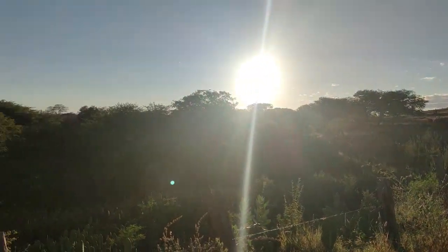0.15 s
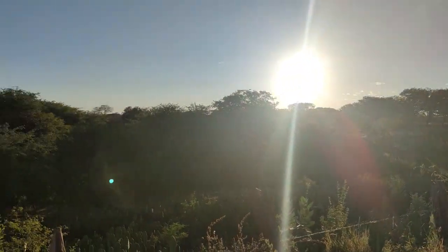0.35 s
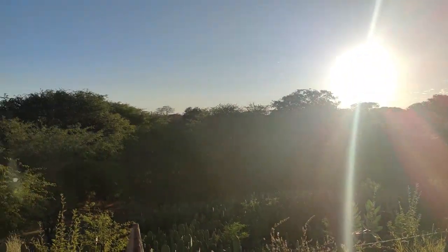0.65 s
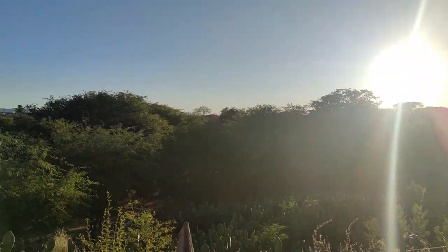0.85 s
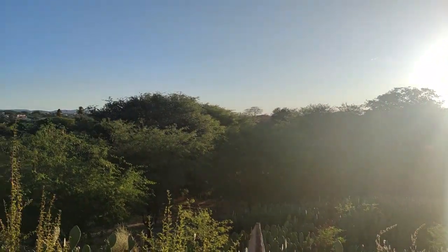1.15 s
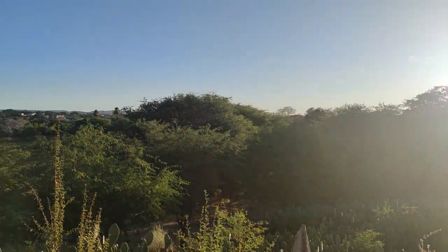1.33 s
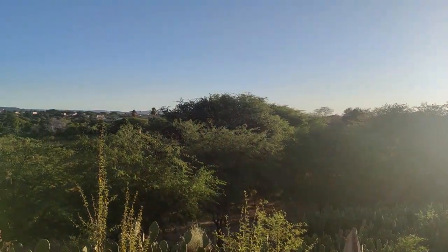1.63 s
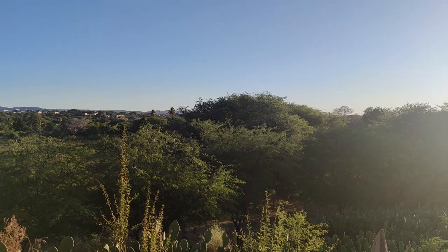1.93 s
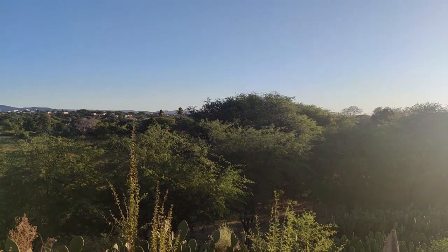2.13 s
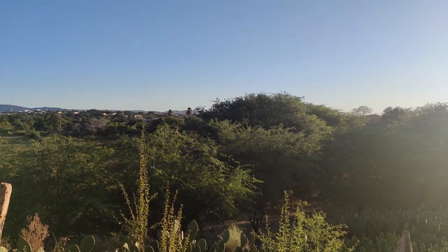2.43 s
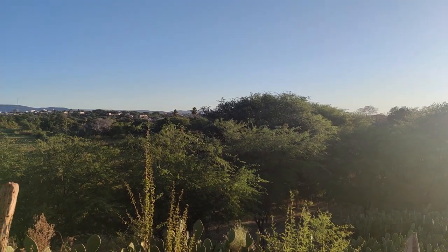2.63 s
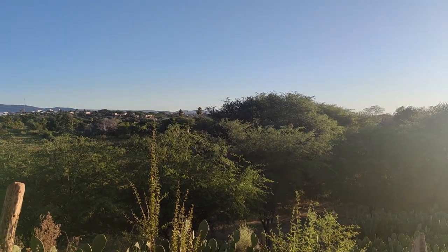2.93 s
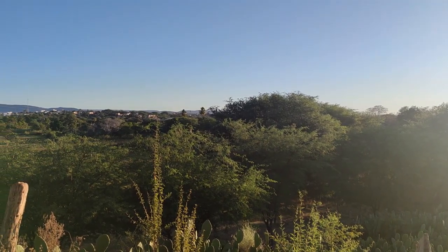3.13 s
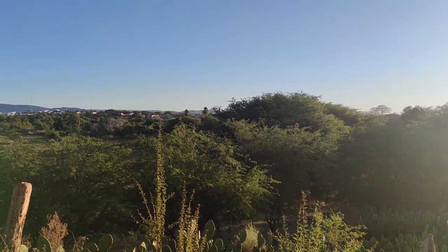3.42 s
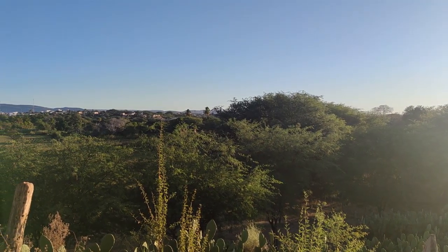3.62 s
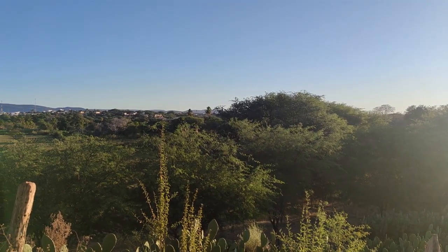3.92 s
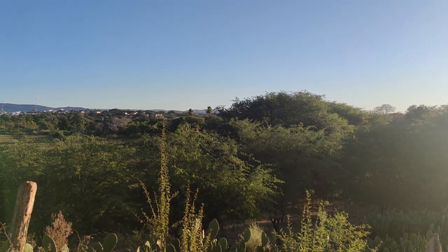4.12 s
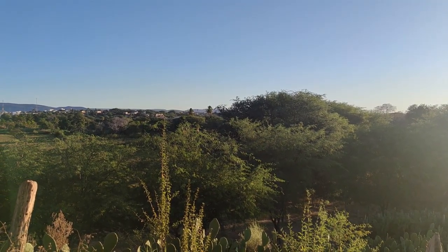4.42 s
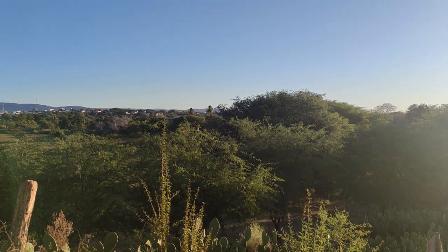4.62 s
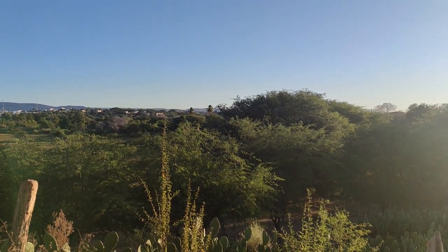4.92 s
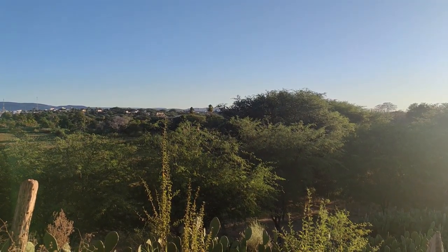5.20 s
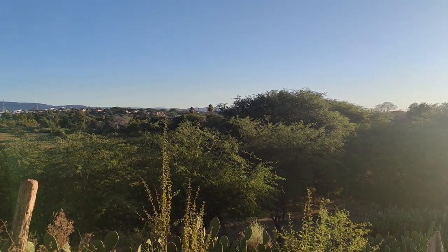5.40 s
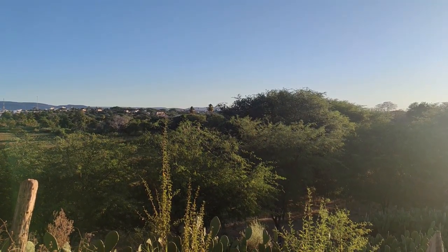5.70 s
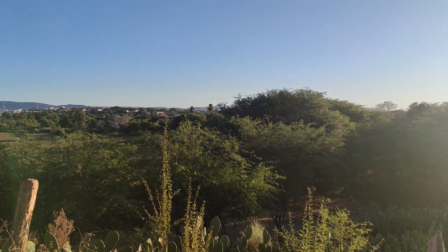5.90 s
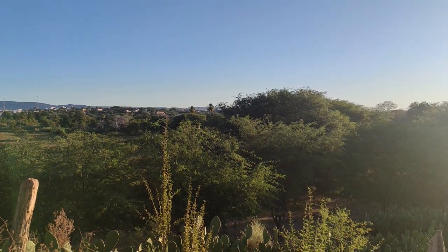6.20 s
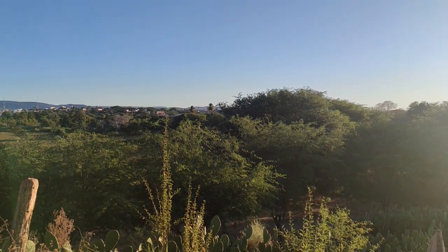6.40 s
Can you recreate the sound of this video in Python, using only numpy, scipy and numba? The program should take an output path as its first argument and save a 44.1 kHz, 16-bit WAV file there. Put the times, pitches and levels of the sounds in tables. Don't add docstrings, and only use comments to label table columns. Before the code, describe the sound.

Burry bird calls and rapid high trills over faint leafy hiss, with handling clicks and muffled wind thumps in the opening second or so.

```python
import sys
import numpy as np
from scipy import signal
from scipy.fft import rfft, irfft, dct
from scipy.io import wavfile
from scipy.ndimage import uniform_filter1d
from numba import njit

SR = 44100
rng = np.random.default_rng(int(sys.argv[2]) if len(sys.argv) > 2 else 0)


def ratio_of_db(decibels):
    return 10 ** (np.asarray(decibels, float) / 20)


def to_wav(s):
    ch = np.atleast_2d(s).T
    pcm = np.round(np.clip(ch, -1, 1) * 32767)
    wavfile.write(sys.argv[1], SR, pcm.astype(np.int16))


N = 288855
T = np.arange(N) / SR
PORT_LAG = 21


def walk(rate_hz):
    k = int(SR / rate_hz)
    held = np.repeat(rng.standard_normal(N // k + 1), k)
    return 1.816 * uniform_filter1d(uniform_filter1d(held, k), k)[:N]


def unit(x):
    return x / np.sqrt(np.mean(x ** 2))


def add(out, start_s, sound, pan_db):
    i = int(start_s * SR)
    sound = sound[max(-i, 0):N - i]
    i = max(i, 0)
    out[:, i:i + len(sound)] += sound * ratio_of_db(np.array([[pan_db], [-pan_db]]) / 2)


@njit
def low_pass(x, hz, damp):
    y, b, l = np.empty(len(x)), 0., 0.
    for i in range(len(x)):
        g = np.tan(np.pi * hz[i] / SR)
        v = (b + g * (x[i] - l)) / (1 + g * (g + damp))
        y[i] = l + g * v
        b, l = 2 * v - b, l + 2 * g * v
    return y


def wind():
    # t/s, level/dB, left minus right/dB
    slow_wind = [(0, -38.5, 16), (.18, -35.5, 20.5), (0.501, -45, 4.5), (.64, -39, -14.5), (.97, -35, -7),
                 (1.26, -28, -8), (1.57, -43, 16), (1.7, -47.5, 4), (2.0, -46, -0.5), (2.45, -49.5, 2),
                 (2.65, -50.5, 4.5), (3.57, -45.5, -0.5), (4.08, -43.5, -5), (4.27, -48, 5), (4.6, -46, -6),
                 (5.05, -46.5, 1.5), (5.76, -51, 4.5), (6.55, -49.5, -0.5)]
    # t/s, half width/s, boost/dB, left minus right/dB
    puffs = [(.16, .06, 3, 11), (0.509, .03, 9, -7), (0.698, 0.032, 6, -0.5), (0.948, 0.055, 5, 2),
             (1.02, .03, 0, 17), (1.92, .05, 5, 4.5), (2.47, .04, 6.5, -14), (2.929, 0.031, 3.5, -22),
             (3.36, 0.06, 5, -5), (3.7, 0.035, 6.5, -1), (4.048, 0.1, 8, -8), (4.549, 0.029, 4, -5),
             (4.672, .04, 9, -2.5), (5.12, 0.028, 4, -7.5), (5.28, 0.033, 3, -9.5),
             (5.639, 0.012, 11.5, 10), (6.17, 0.022, -4, -1)]
    # t/s, peak/dB, f/Hz, left minus right/dB
    eddies = [(0.161, -25, 162, 32), (0.716, -27.5, 240, -34), (0.956, -22.5, 260, -28),
              (1.019, -21, 200, 16), (1.178, -17, 230, -21), (1.19, -13.5, 120, -18),
              (1.216, -11.5, 300, -52), (1.251, -20, 260, -28), (1.301, -14.5, 240, -44),
              (1.308, -16, 280, -49), (4.023, -38, 220, -21)]
    calm_db, bright_per_db = -47, 0.2378
    s, db, pan_db = np.transpose(slow_wind)
    db, pan_db = np.interp(T, s, db), np.interp(T, s, pan_db)
    for at_s, half_s, boost_db, lean_db in puffs:
        puff = np.exp(-((T - at_s) / half_s) ** 2)
        db, pan_db = db + boost_db * puff, pan_db + lean_db * puff
    db = db - 10 * np.log10(np.cosh(pan_db * np.log(10) / 20))
    out = np.zeros((2, N))
    for port, side in enumerate((.5, -.5)):
        buffet_db = 3 * np.tanh(walk(30)) + 1.83 * walk(60)
        gust_db = db + side * pan_db
        hz = 80 * ratio_of_db(bright_per_db * (gust_db - calm_db) + 0.33 * buffet_db)
        hz = np.clip(hz, 20, 600)
        rush = low_pass(rng.standard_normal(N), hz, 2.62)
        rush = low_pass(rush, 0.97 * hz, 1.45) / np.sqrt(hz)
        out[port] = ratio_of_db(gust_db + 5.5) * unit(ratio_of_db(buffet_db) * rush)
    for s, db, hz, pan_db in eddies:
        cycles = np.arange(-2, 2, hz / SR)
        eddy = np.exp(-(cycles / 0.49) ** 2) * np.cos(2 * np.pi * cycles)
        add(out, s - 2 / hz, ratio_of_db(db - abs(pan_db) / 2) * eddy, pan_db)
    return signal.sosfilt(signal.butter(2, 22, "high", fs=SR, output="sos"), out)


def air():
    # f/Hz, density/dB per Hz
    spectrum = [(150, -15.5), (250, -11.5), (398, -8.5), (1430, -13.5), (1690, -16), (1930, -10.5),
                (2550, -12), (3170, -14), (4560, -15), (5660, -18), (6470, -14), (9320, -29), (13200, -25)]
    level_db = -66.5 + 4.0
    f = np.fft.rfftfreq(N, 1 / SR) + 1
    corner_hz, density_db = np.transpose(spectrum)
    colour = ratio_of_db(np.interp(np.log(f), np.log(corner_hz), density_db))
    shared = rng.standard_normal(N)
    mix = np.clip(.6 - f / 5000, 0, 1)
    common = rfft([np.roll(shared, PORT_LAG), shared])
    own = rfft(rng.standard_normal((2, N)))
    noise = colour * (mix * common + np.sqrt(1 - mix ** 2) * own)
    out, swell = 0, walk(1.545)
    place = 3 * np.log2(f / 150)
    for band in range(21):
        flicker_db = 0.27 * swell + 2.3 * np.array([walk(12), walk(15)])
        out = out + ratio_of_db(flicker_db) * irfft(noise * np.clip(1 - abs(place - band), 0, 1), N)
    above = irfft(rfft(out) * (f > 300) * (f < 13200), N)
    return out * ratio_of_db(level_db) / np.sqrt(np.mean(above ** 2))


def insects():
    band = signal.butter(4, [13900, 16000], "band", fs=SR, output="sos")
    throb_db = 7 * np.tanh(1.4 * walk(79) + .5)
    return ratio_of_db(-73.0) * unit(ratio_of_db(throb_db) * signal.sosfilt(band, rng.standard_normal((2, N))))


def note(out, s, hz, partials_db, burr, pan_db, burr_hz=155, edge_s=0.0019):
    t = np.arange(s[0], s[-1], 1 / SR)
    chance = rng.standard_normal((2, SR // 3))
    shake = np.interp(t, t[::64], chance[0, :len(t[::64])])
    rasp = unit(uniform_filter1d(uniform_filter1d(chance[1], size=24), size=24))[:len(t)]
    flutter = np.sin(2 * np.pi * burr_hz * t + 0.0043 * np.cumsum(shake))
    pitch = uniform_filter1d(np.interp(t, s, hz), size=300, mode="nearest")
    pitch = pitch * (1 + burr * (0.021 * flutter + 0.018 * shake))
    phase = 2 * np.pi * np.cumsum(pitch) / SR
    tone = sum(ratio_of_db(np.interp(t, s, db)) * np.sin((k + 1) * phase) for k, db in enumerate(partials_db))
    edge = np.clip(np.minimum(t - s[0], s[-1] - t) / edge_s, 0, 1)
    rough = 1 + np.clip(burr, 0, 1) * flutter + .28 * burr * rasp
    add(out, s[0], 3.25 * edge * tone * rough, pan_db)


def call(out, s, length_s, top_hz, db, pan_db, up, down, start, end, bend, drop, sag_db, first_sag_db,
         swell_db, first_db, third_db, fourth_db, burr):
    u = np.linspace(0, 1, num=25)
    rise = (1 - start) * np.clip(1 - u / up, 0, 1) ** bend
    fall = (1 - end) * np.clip((u - down) / (1 - down), 0, 1) ** drop
    share = 1 - rise - fall
    under_oct = np.log2(share)
    breath_db = 3.5 * np.interp(u, u[::4], rng.standard_normal(size=7))
    second = db + sag_db * under_oct + swell_db * (u - .5) + breath_db
    first = second + first_db + first_sag_db * under_oct
    third = second + third_db + 25 * under_oct
    fourth = second + fourth_db + 35 * under_oct
    partials_db = [first, second, third, fourth, fourth - 19, third - 24]
    note(out, s + u * length_s, top_hz * share, partials_db, burr, pan_db)


def flycatchers():
    # t/s, length/s, top f/Hz, level/dB, left minus right/dB
    harsh = [
        (2.782, .113, 1735, -55.5, 1),
        (3.02, .085, 1832, -74.5, 1.5),
        (4.49, .1, 1748, -69, 0),
        (6.098, .115, 1731, -54, 4.5),
        (6.37, .09, 1850, -72, -4.5),
    ]
    away = [
        (-0.04, .15, 1725, -57, -.5),
        (1.985, .135, 1452, -68.5, 1.5),
    ]
    sharp = [
        (.298, .108, 1717, -42, -4.5),
        (3.928, .11, 1752, -58, 1.5),
        (6.533, 0.099, 1761, -43.5, -3),
    ]
    open_throat = [
        (3.208, .112, 1660, -49.5, 3),
        (4.893, .07, 1880, -60, -0.5),
    ]
    drawn = [
        (.505, .25, 1298, -60, -6.5),
        (3.41, .27, 1305, -63, -10),
    ]
    bows = [
        (5.05, .245, 1494, -66, -2.5),
    ]
    # t/s, length/s, top f/Hz, end f/Hz, level/dB
    arches = [(.39, .1, 1685, 1181, -60), (.785, .095, 1274, 1222, -74.5), (.92, .235, 1490, 1176, -65),
              (1.51, .055, 1962, 1762, -75), (2.585, .205, 1223, 981, -64.5),
              (3.55, .17, 1484, 1152, -71.5), (4.15, .235, 1497, 1143, -70.5),
              (4.72, 0.077, 1085, 1055, -71)]
    swoops = [(.075, .07, 1546, 1012, -66.5), (.725, .055, 1685, 1255, -59), (2.42, .105, 1520, 834, -68),
              (5.615, 0.087, 1548, 938, -63.5), (5.745, 0.093, 1072, 830, -74), (6.36, .1, 1010, 830, -71)]
    # t/s, f/Hz, level/dB
    waver = [
        (5.77, 1037, -76.5),
        (5.82, 1228, -58.5),
        (5.868, 1141, -71.5),
        (5.904, 1252, -60),
        (5.985, 1040, -70.5),
    ]
    harsh_voice = dict(up=.5, down=.8, start=.66, end=0.65, bend=2.7, drop=1.6, sag_db=14.5, first_sag_db=0, swell_db=4, first_db=-10, third_db=-11, fourth_db=-14, burr=1.1)
    chirp_voice = dict(up=.21, down=0.28, start=.72, end=.58, bend=1.6, drop=1.6, sag_db=20, first_sag_db=-5.5, swell_db=-1, first_db=-20.5, third_db=-19.5, fourth_db=-19, burr=0.23)
    drawn_voice = dict(up=0.65, down=.62, start=.77, end=.78, bend=2.4, drop=4.8, sag_db=8, first_sag_db=43, swell_db=-3.5, first_db=-7, third_db=-14, fourth_db=-18.5, burr=0.12)
    bow_voice = dict(up=0.76, down=0.83, start=.67, end=0.7, bend=2.6, drop=1.9, sag_db=0.5, first_sag_db=48, swell_db=-1.5, first_db=1, third_db=-44, fourth_db=-27, burr=0.23)
    arch_voice = dict(up=.45, down=.52, bend=2.1, drop=4.2, sag_db=7, first_sag_db=9.5, swell_db=1, first_db=-13, third_db=-25, fourth_db=-35, burr=0.13)
    swoop_voice = dict(up=.25, down=0.25, bend=1.5, drop=1.3, sag_db=7, first_sag_db=5.5, swell_db=2, first_db=-12.5, third_db=-23, fourth_db=-48, burr=.2)
    away_voice = dict(harsh_voice, first_db=-21.5, third_db=-22.5, fourth_db=-26.5, burr=.5)
    open_voice = dict(chirp_voice, first_db=-11.5)
    out = np.zeros((2, N))
    near = ((harsh, harsh_voice), (away, away_voice), (sharp, chirp_voice), (open_throat, open_voice),
            (drawn, drawn_voice), (bows, bow_voice))
    for rows, voice in near:
        for row in rows:
            call(out, *row, **voice)
    for rows, voice, rise, pan_db in ((arches, arch_voice, .9, 5), (swoops, swoop_voice, .5, 4.6)):
        for s, length_s, top_hz, end_hz, db in rows:
            end = end_hz / top_hz
            call(out, s, length_s, top_hz, db, pan_db, start=1 - rise * (1 - end), end=end, **voice)
    s, hz, db = np.transpose(waver)
    note(out, s, hz, [db - 31.5, db], burr=.36, pan_db=1)
    return out


def chirp(hz, sweep_hz, length_s):
    u = np.linspace(0, 1, int(length_s * SR))
    shape = np.sin(np.pi * u ** .75) ** 2
    return shape * np.sin(2 * np.pi * np.cumsum(hz + sweep_hz * (.5 - u)) / SR)


def trill(out, bursts, gap_s, sweep_hz, count):
    for s, db, hz, pan_db in bursts:
        chance_db = rng.standard_normal(count)
        for k in range(count):
            add(out, s + k * gap_s, ratio_of_db(db + 1.0 + chance_db[k]) * chirp(hz, sweep_hz, 0.0079), pan_db)


def small_birds():
    # t/s, peak/dB, centre f/Hz, left minus right/dB
    steep_bursts = [(3.7294, -47, 6510, 1), (3.8307, -46, 6660, -1), (3.935, -45, 6646, -3.5),
                    (4.044, -42.5, 6820, -1.5), (4.152, -44, 6690, -1), (4.2702, -45, 6700, 6),
                    (4.3934, -43.5, 6750, -1.5), (4.5143, -43, 6840, -4.5), (4.6443, -44, 6725, -0.5)]
    flat_bursts = [(0.0014, -60.5, 6400, 4.7), (0.1116, -60.5, 6120, 3.5), (0.232, -59.5, 6350, 2.0),
                   (0.4905, -58, 6430, 3.1), (0.634, -55, 6330, 2.8), (5.0378, -55, 6220, 2.2),
                   (5.1549, -47.5, 6240, 2), (5.2772, -48.5, 6260, 3.1), (5.3953, -48.5, 6330, 4.3),
                   (5.5195, -50.5, 6250, 2.8), (5.6354, -48.5, 6320, 1), (5.7608, -49, 6240, 3.4)]
    # t/s, peak/dB, f/Hz
    chips = [(1.543, -61.5, 4760), (1.6014, -57, 4646), (4.4035, -57, 4790), (4.4635, -57, 4650),
             (5.4342, -57, 4700), (5.4959, -57.5, 4630), (6.0202, -62.5, 4740), (6.0856, -61, 4680)]
    out = np.zeros((2, N))
    trill(out, steep_bursts, .0095, 1500, count=4)
    trill(out, flat_bursts, .0096, 850, count=5)
    for s, db, hz in chips:
        add(out, s, ratio_of_db(db) * chirp(hz, 610, 0.032), .3)
    return out


def scrub(birds, tail_db, t60_s, echo_db):
    # delay/s, level/dB
    echoes = [
        (.0031, -7.5),
        (0.0112, -8),
        (0.025, -46.5),
    ]
    t = T[:SR]
    path = rng.standard_normal((2, SR)) * ratio_of_db(-60 * t / t60_s) * np.clip(t / 0.0074, 0, 1)
    path = path * ratio_of_db(3 * np.tanh(walk(90)[:SR]))
    path = ratio_of_db(tail_db) * unit(path) / np.sqrt(SR)
    path[:, 0] = 1
    for s, db in echoes:
        path[:, int(s * SR)] += ratio_of_db(db + echo_db)
    heard = signal.fftconvolve(birds, path, axes=1)[:, :N]
    return np.array([np.roll(heard[0], PORT_LAG), heard[1]])


def creaks():
    # t/s, peak/dB, ring f/Hz, upper ring/dB, left minus right/dB
    case_slips = [(0.047, -41.5, 1020, 2, 1), (0.216, -39, 1255, -11, -8), (0.251, -34.5, 1190, -7.5, -4.5),
                  (0.294, -35.5, 1300, -4, -5), (0.521, -36.5, 1310, 1.5, -7),
                  (0.546, -37.5, 1060, -19, -6), (0.613, -40.5, 1300, 3.5, -10),
                  (0.639, -35, 1160, 0.5, -4.5), (0.684, -21.5, 1136, -2.5, -4.5),
                  (0.735, -33, 635, -17, -0.5), (0.745, -44.5, 622, 7, 12), (0.834, -38, 1370, -9, -2.5),
                  (0.888, -39.5, 1144, -8, -15), (0.945, -41, 637, 2.5, 2), (0.99, -37, 676, -4, -4),
                  (1.04, -48, 630, 13.5, 2), (1.052, -43, 1010, 2, -11), (1.141, -39, 900, -6.5, -10)]
    # t/s, length/s, level/dB, centre f/Hz
    rubs = [
        (0.2, 0.24, -63, 1370),
        (0.714, 0.046, -51, 2544),
        (0.88, 0.033, -53, 1250),
        (0.925, 0.18, -57.5, 1230),
        (1.204, 0.065, -60, 770),
    ]
    out, t = np.zeros((2, N)), T[:800]
    push = np.sin(np.pi / 2 * np.clip(t / .0013, 0, 1)) ** 2
    for s, db, hz, upper_db, pan_db in case_slips:
        low = np.sin(2 * np.pi * hz * t) * ratio_of_db(-60 * t / 0.0061)
        high = ratio_of_db(upper_db) * np.sin(2 * np.pi * 2500 * t) * ratio_of_db(-60 * t / 0.004)
        add(out, s, ratio_of_db(db + 8.5) * push * (low + high), pan_db)
    for s, length_s, db, hz in rubs:
        grains = rng.standard_normal(SR // 4) * rng.exponential(size=SR // 4) ** 3
        grains = grains[:int(length_s * SR)]
        band = signal.butter(2, [hz / 2, 1.5 * hz], "band", fs=SR, output="sos")
        scratch = unit(signal.sosfilt(band, grains)) * np.hanning(len(grains)) ** .5
        add(out, s, ratio_of_db(db) * scratch, -4)
    return out


def scene():
    ground = wind() + air() + insects() + creaks()
    small = scrub(small_birds(), tail_db=-18, t60_s=.3, echo_db=-7.5)
    return ground + small + scrub(flycatchers(), tail_db=-9.0, t60_s=.62, echo_db=-3.0)


def fold(x, sign):
    size = x.shape[2]
    half = size // 2
    rise = np.sin(np.pi * (np.arange(size) + .5) / (2 * size))
    up, down = rise[half:], rise[half - 1::-1]
    a, b = x[:, :-1, half:], x[:, 1:, :half]
    mirrored = a[..., ::-1]
    new_a = (up * mirrored + sign * down * b)[..., ::-1]
    new_b = up * b - sign * down * mirrored
    a[:], b[:] = new_a, new_b


def phone_processing(x):
    # f/Hz, step/dB
    coarse_steps = [(200, -30), (450, -6), (800, 3), (3000, 5), (6000, 8), (9000, 12), (13000, 12),
                    (15500, 8)]
    size, count, top_hz = 1024, 8, 15780
    bands, frames = size // count, N // size + 3
    lead = size + size // 4
    x = np.pad(x, ((0, 0), (lead, frames * size - N - lead))).reshape(2, frames, size)
    fold(x, -1)
    c = dct(x, type=4, norm="ortho").reshape(2, frames, bands, count)
    hz = (np.arange(bands) + .5) * count * SR / (2 * size)
    corner_hz, corner_db = np.transpose(coarse_steps)
    over_db = np.interp(np.log(hz), np.log(corner_hz), corner_db)
    whim_db = 4 * 2.2 * uniform_filter1d(rng.standard_normal((frames, bands)), size=3, axis=0)
    level = np.sqrt(np.mean(c ** 2, axis=3)) + 1e-9
    usual = np.median(level, axis=1, keepdims=True)
    c = c * np.clip(level / usual / 1.5, 0, 1)[..., None] ** (.8 * (hz[:, None] > 350))
    step = .7 * usual * (level / usual) ** .3 * ratio_of_db(over_db + whim_db)
    c = (np.round(c / step[..., None]) * step[..., None]).reshape(2, frames, size)
    x = dct(c * (np.arange(size) * SR / (2 * size) < top_hz), type=4, norm="ortho")
    fold(x, 1)
    return x.reshape(2, -1)[:, lead:][:, :N]


def band_limit(x):
    return signal.sosfilt(signal.butter(12, 16450, fs=SR, output="sos"), x)


def record(dry):
    mix = phone_processing(dry)
    return band_limit(mix)


dry = scene()
out = record(dry)
to_wav(out)
```